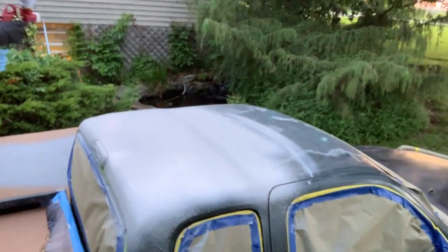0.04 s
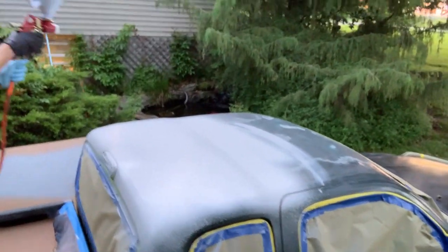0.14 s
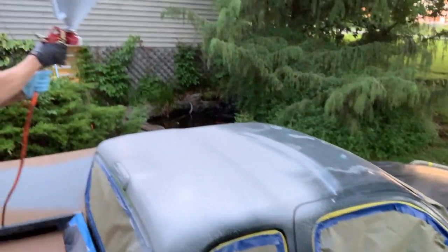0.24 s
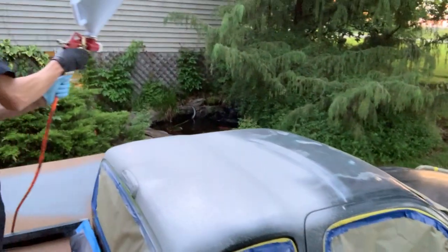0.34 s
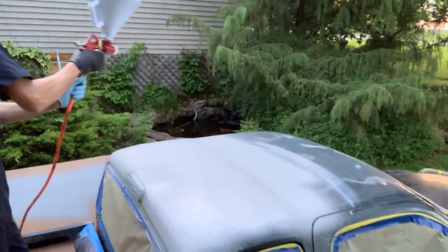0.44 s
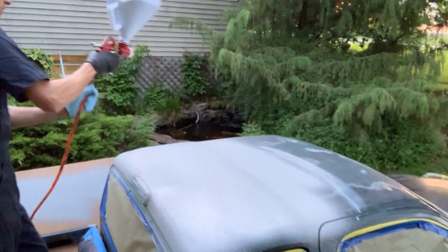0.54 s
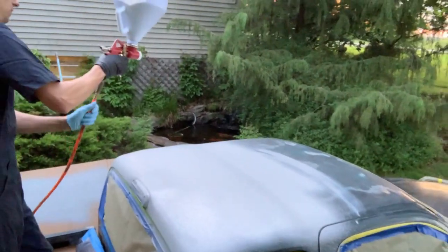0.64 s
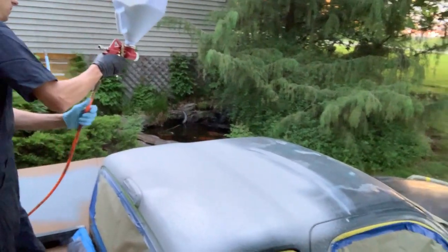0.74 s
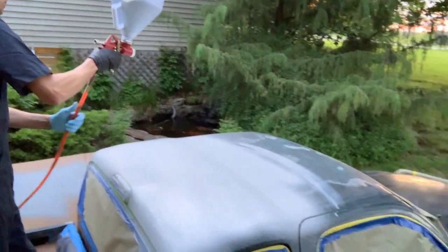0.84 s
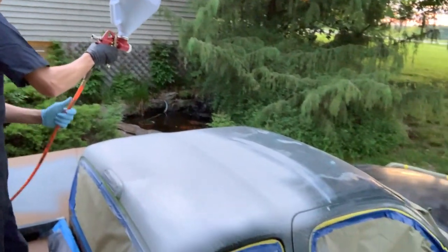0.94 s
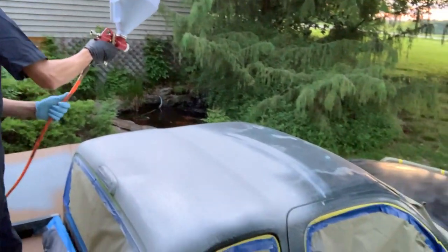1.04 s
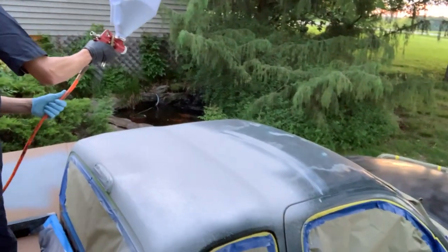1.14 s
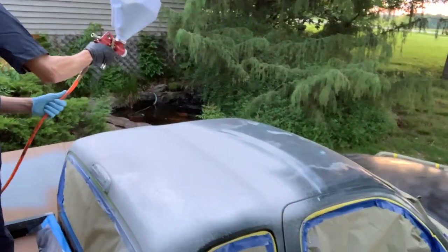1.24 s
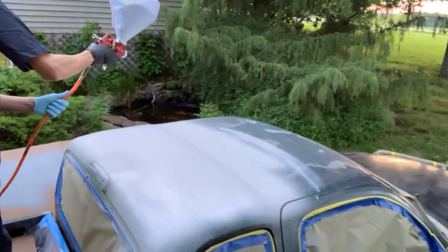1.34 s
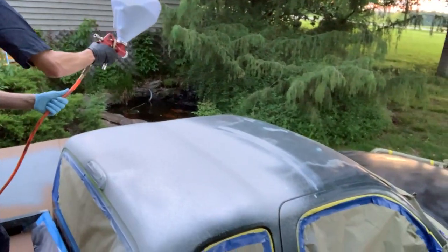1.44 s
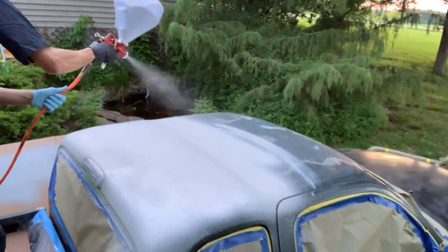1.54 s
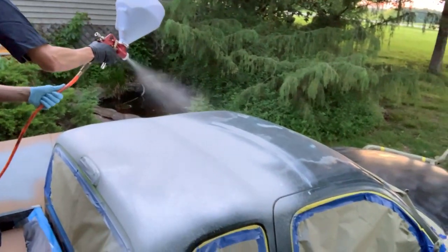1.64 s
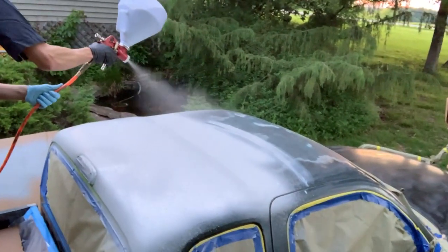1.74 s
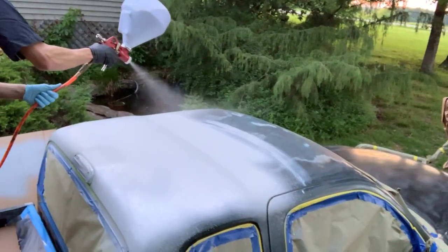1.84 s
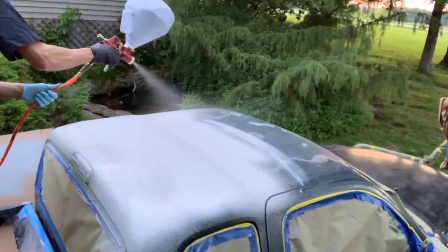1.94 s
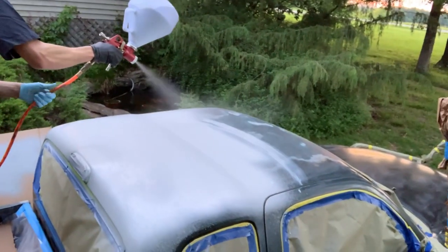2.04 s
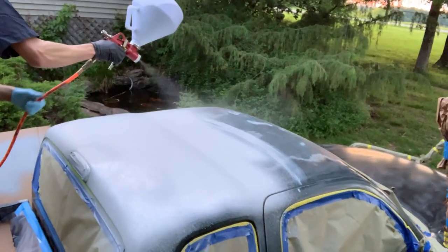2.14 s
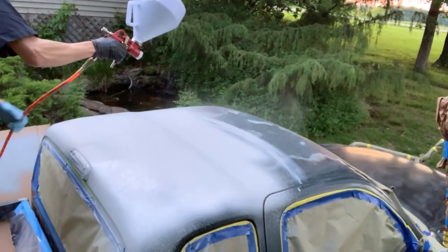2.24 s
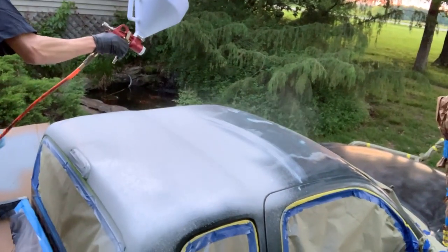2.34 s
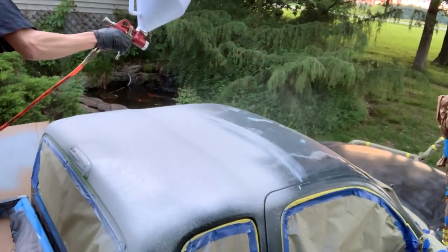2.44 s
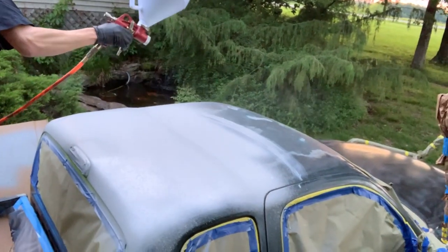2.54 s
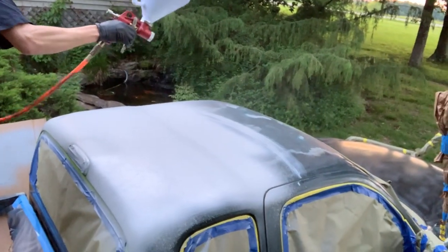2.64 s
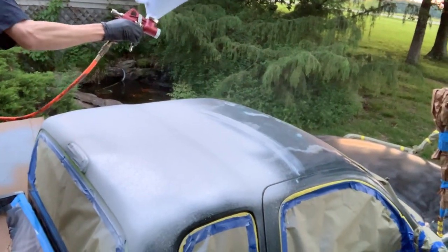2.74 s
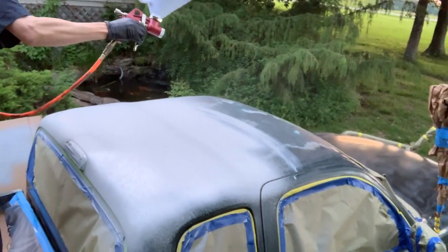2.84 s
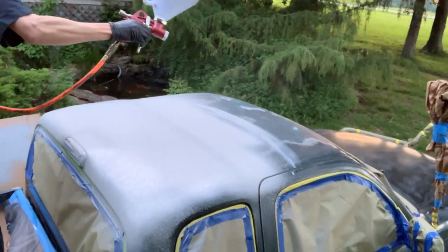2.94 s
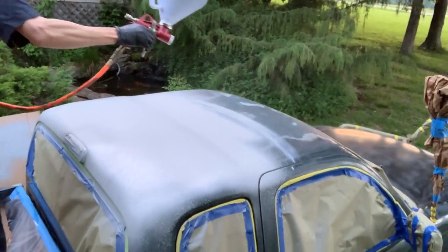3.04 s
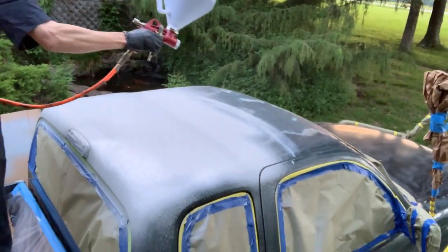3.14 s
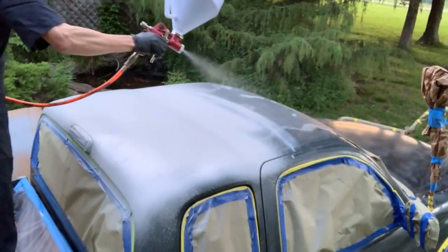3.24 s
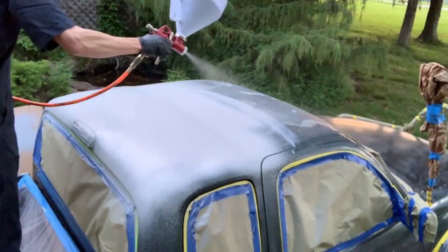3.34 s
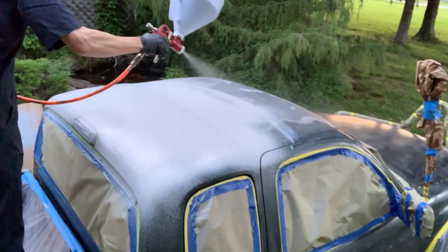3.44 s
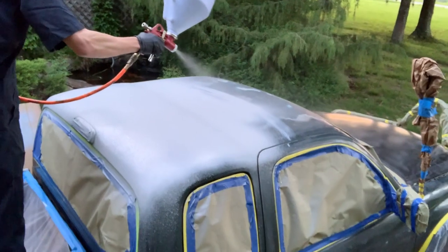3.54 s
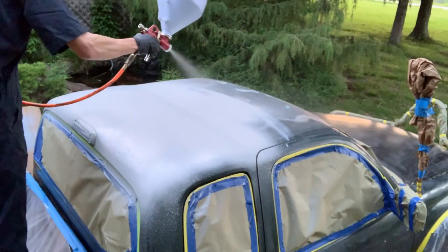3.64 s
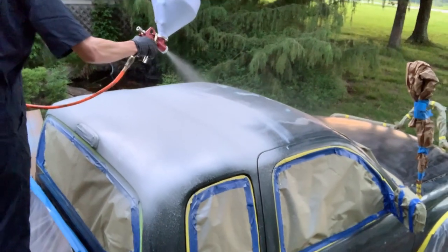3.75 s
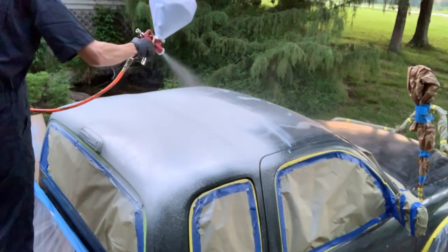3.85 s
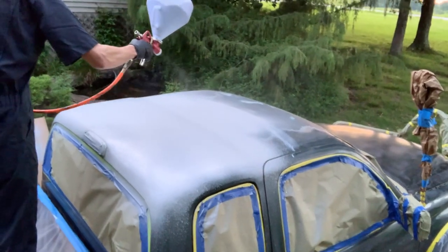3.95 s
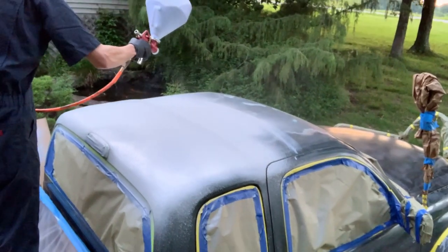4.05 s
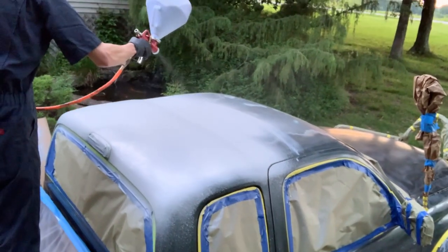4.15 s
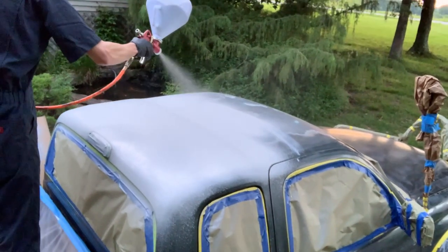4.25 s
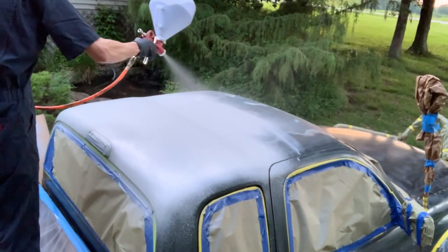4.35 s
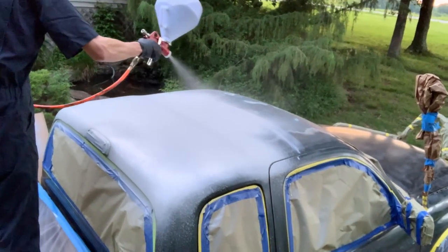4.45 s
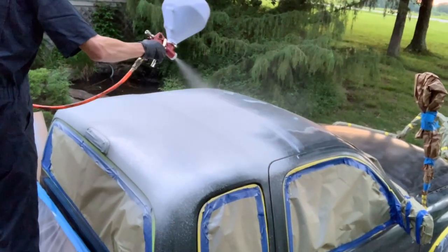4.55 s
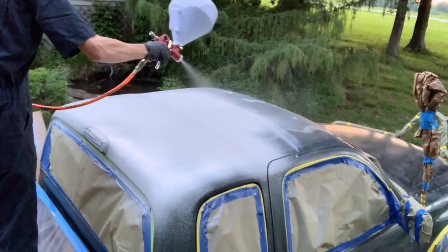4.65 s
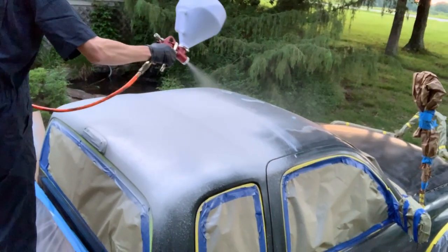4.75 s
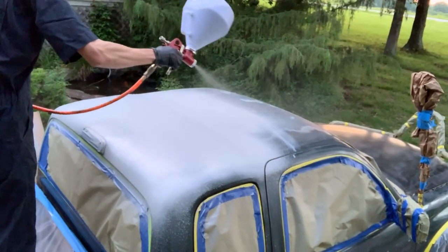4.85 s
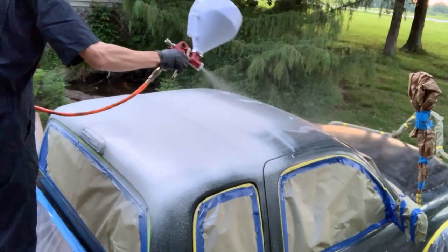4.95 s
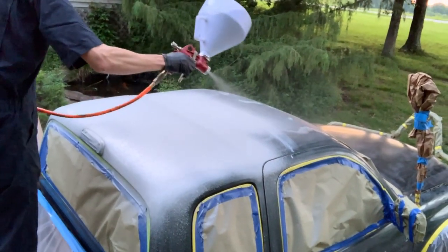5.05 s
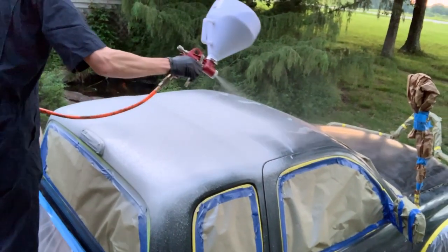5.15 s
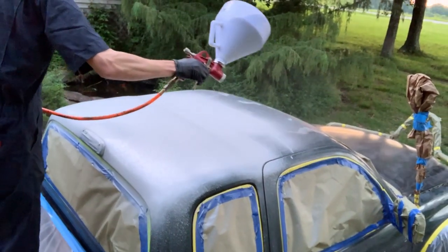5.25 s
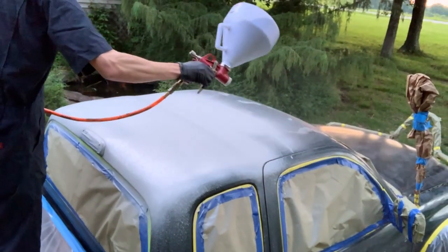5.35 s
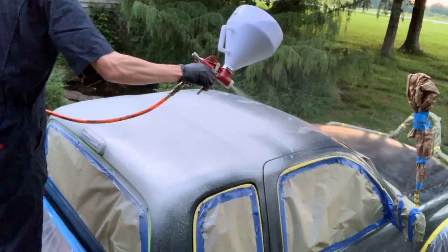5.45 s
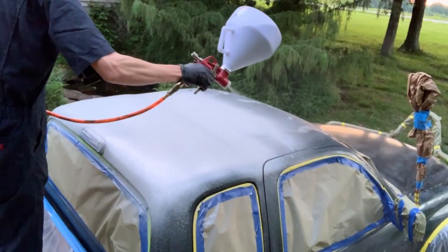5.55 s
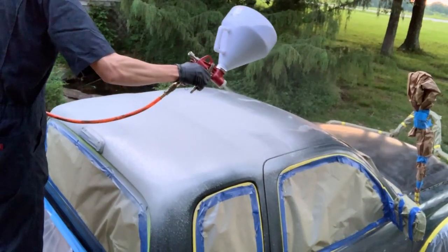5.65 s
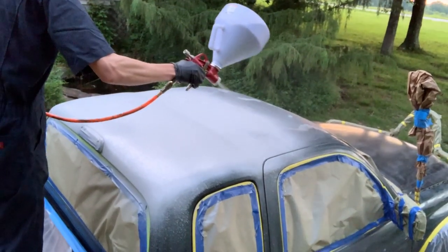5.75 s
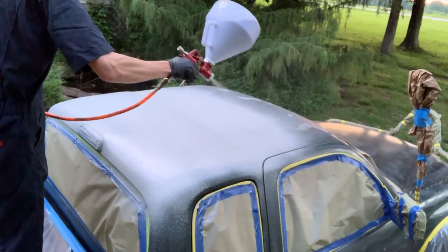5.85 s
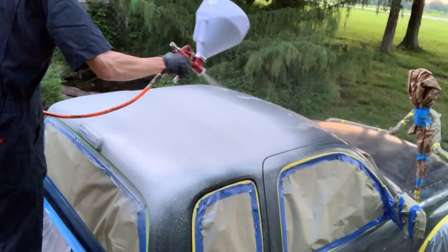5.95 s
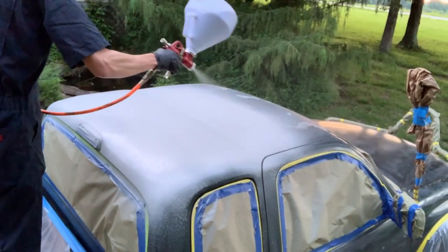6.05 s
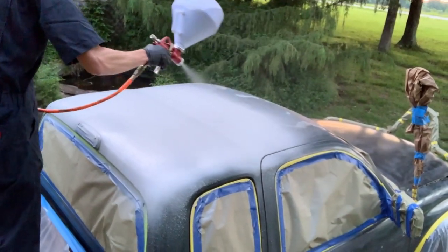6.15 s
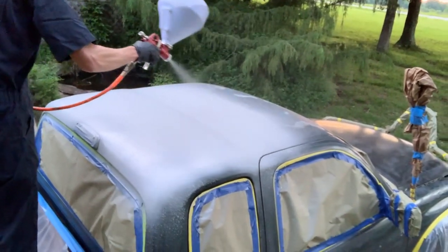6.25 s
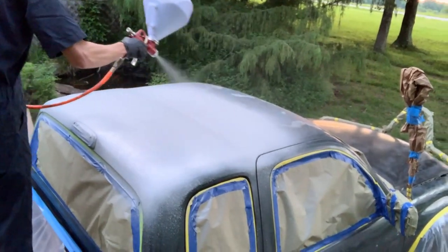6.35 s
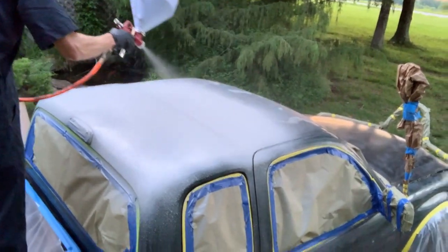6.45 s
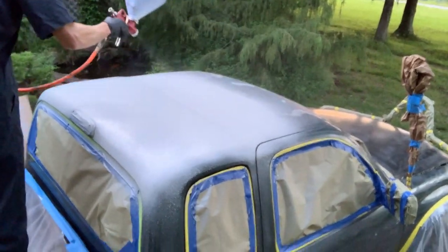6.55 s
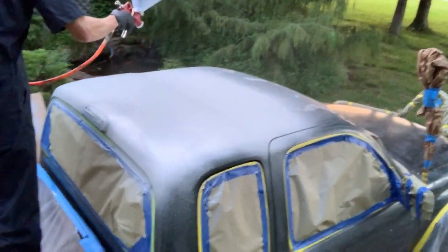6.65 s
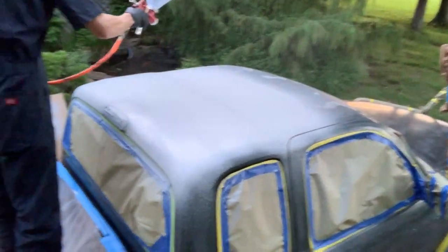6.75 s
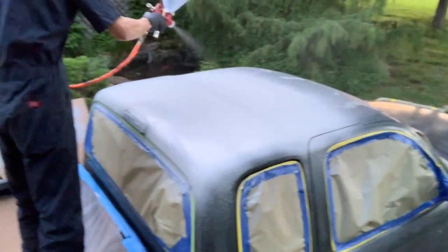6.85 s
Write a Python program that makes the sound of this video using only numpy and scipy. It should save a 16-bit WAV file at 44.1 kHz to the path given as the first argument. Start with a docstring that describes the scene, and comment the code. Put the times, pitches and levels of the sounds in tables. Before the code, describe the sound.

Outdoors, a breeze rumbles on a hand-held microphone while a paint gun gives off a constant airy hiss. After some low bumps, it sprays one short, louder burst, then three more close together, the hiss shifting with a hollow sweep as it passes over a truck cab. Light knocks fall here and there, a faint engine drones far off, and a dull thump and a gust come at the close.

```python
"""Air hisses steadily from a spray gun, over a breeze rumbling on a hand-held microphone and a few dull
thumps and knocks. A truck cab is being painted in a garden: four trigger pulls add the louder, fuller
roar of the paint fan to the turbulent air jet. The hiss interferes with its reflection from the cab's
roof, so it sweeps like a flanger as the gun moves. A distant engine hums at harmonics of its firing rate."""
import sys
import numpy as np
from scipy import signal
from scipy.fft import rfft, irfft, next_fast_len
from scipy.io import wavfile
from scipy.ndimage import uniform_filter1d, map_coordinates

SR = 44100
rng = np.random.default_rng(int(sys.argv[2]) if len(sys.argv) > 2 else 0)


def wrap_up_sound(samples):
    """Save the sound to the file named by the first command line argument, as 16-bit audio."""
    columns = np.atleast_2d(samples).T
    # keep every value between -1 and 1, then stretch to whole-number steps
    tamed = np.clip(columns, -1, 1)
    steps = np.round(tamed * 32767).astype(np.int16)
    wavfile.write(sys.argv[1], SR, steps)


N = 304290


def from_db(db):
    """Amplitude grows tenfold for every 20 dB."""
    return 10 ** (np.asarray(db) / 20)


def rms_one(x):
    """Normalisation to unit mean power."""
    return x / np.sqrt(np.mean(x ** 2) + 1e-20)


def in_time(rows):
    """Linear interpolation of (time [s], value) rows at every sample."""
    return np.interp(np.arange(N) / SR, *np.transpose(rows))


def drift(hz):
    """Low-passed noise: a random fluctuation of unit power, mostly slower than hz."""
    step, settle = 40, 2000
    r = np.exp(-2 * np.pi * step * hz / SR)
    slow = signal.lfilter([1], [1, -2 * r, r * r], rng.standard_normal(N // step + settle + 2))[settle:]
    return np.interp(np.arange(N) / step, np.arange(len(slow)), rms_one(slow))


def turbulence(colour):
    """Spectral shaping: white noise takes on the given colour, at unit power."""
    size = next_fast_len(N, real=True)
    hz, db = np.transpose(colour)
    bins = np.maximum(np.fft.rfftfreq(size, 1 / SR), 1)
    gain = from_db(np.interp(np.log(bins), np.log(hz), db))
    return rms_one(irfft(rfft(rng.standard_normal(size)) * gain, size)[:N])


def ring(force, hz, t60):
    """A damped oscillator: each impulse starts a sine that falls 60 dB in t60 seconds."""
    r, w = np.exp(-np.log(1000) / (t60 * SR)), 2 * np.pi * hz / SR
    return signal.lfilter([0, np.sin(w)], [1, -2 * r * np.cos(w), r * r], force + 1e-18)


def garden(level_db):
    """Stationary ambient noise, strongest in the bass."""
    # ambient spectrum: (frequency [Hz], relative density [dB])
    colour = [(40, 1.5), (120, 1.5), (200, -7), (450, -3), (800, -5), (1300, -6.5), (3000, -8), (8000, -41)]
    return from_db(level_db) * turbulence(colour)


def engine(firing_hz, waver, fading_db):
    """Periodic firing gives a harmonic series; each line fades independently on its way here."""
    # engine harmonics: (multiple of the firing rate, relative level [dB])
    harmonics = [(2, -54), (4, -57), (6, -66.5), (7, -60.5), (8, -59), (10, -58.5), (12, -57), (15, -52)]
    # slow change of the whole hum: (time [s], gain [dB])
    loudness = [(0, -0.5), (1.2, 0.5), (3, -1.5), (4.2, -4), (6.9, -5)]
    phase = 2 * np.pi * np.cumsum(firing_hz * (1 + waver * drift(1.95))) / SR
    hum = 0
    for k, db in harmonics:
        amplitude = from_db(db + fading_db * drift(1.5))
        hum += amplitude * np.sin(k * phase + rng.uniform(0, 2 * np.pi))
    return np.sqrt(2) * from_db(in_time(loudness)) * hum


def breeze():
    """Slow eddies press on the microphone, and their pressure fluctuations make a rumble."""
    # gusts: (time [s], level [dB])
    gusts = [(0, -23), (.4, -17), (1.7, -22), (2.0, -28), (2.6, -25.5), (4.05, -23.5), (4.45, -28.5),
             (6.3, -31), (6.5, -15.5), (6.9, -21.5)]
    # eddy spectrum: (frequency [Hz], relative density [dB])
    colour = [(2, -6), (5, 5), (11, 5.5), (17, 3.5), (22, -23), (29, -16), (37, -16.5), (46, -12),
              (65, -34), (88, -34.5), (105, -38), (300, -83)]
    return from_db(in_time(gusts)) * turbulence(colour)


def thumps(scuff_db, scuff_s, shudder_hz, shudder_db, fade_db_per_s):
    """Damped low modes ring as dull thumps on the microphone, each with a scuff."""
    # pulses that start a thump or, close behind, shape its ringing: (time [s], level [dB], duration [s])
    pulses = [(0.178, -19, .008), (0.218, -20.5, 0.0071), (.607, -6, 0.0091), (.663, -10, .01),
              (0.697, -14, 0.013), (0.839, -22.5, 0.0091), (1.629, -18, 0.02), (6.417, -10.5, .011),
              (6.463, -9.5, 0.0076), (6.49, -19, 0.0074)]
    # low modes: (frequency [Hz], gain [dB], T60 [s])
    modes = [(37.5, 7.5, 0.13), (60.6, -14, 0.093), (80, -5.5, 0.22), (139, -13.5, 0.08), (186, -17, .08)]
    # scuff of the shifting grip: (frequency [Hz], relative density [dB])
    scuff_colour = [(40, 1), (80, 1), (100, 1), (135, -3), (190, -2), (260, -15), (500, -29)]
    force = np.zeros(N)
    for s, db, length in pulses:
        pulse = np.hanning(int(length * SR))
        at = int(s * SR)
        force[at:at + len(pulse)] -= from_db(db) * pulse / pulse.sum()
    swing = sum(from_db(db) * ring(force, hz, t60) for hz, db, t60 in modes)
    slip = signal.lfilter([1], [1, -np.exp(-1 / (scuff_s * SR))], force + 1e-18)
    scuff = from_db(scuff_db) * slip * turbulence(scuff_colour)
    # the last thump leaves a dying shudder, unsteady in pitch and level
    age = np.maximum(np.arange(N) / SR - pulses[-1][0], 0)
    phase = 2 * np.pi * np.cumsum((age > 0) * shudder_hz * (1 + 0.13 * drift(15))) / SR
    shudder = from_db(shudder_db - fade_db_per_s * age + 4 * drift(12)) * np.sin(phase)
    return swing + scuff + shudder


def knocks(rattle, rattle_s, spread_db):
    """Modal superposition: an impulse and a brief rattle excite each mode with a strength of its own."""
    # impacts: (time [s], body level [dB], clack level [dB], tick level [dB])
    impacts = [(.186, -35, -32.5, -55), (.711, -14, -21, -38), (.757, -25, -35, -55),
               (.786, -26, -25.5, -33), (.83, -42, -35, -43), (1.714, -27.5, -45, -55),
               (2.441, -15.5, -34.5, -18.5), (2.461, -19.5, -31, -37), (3.105, -38, -32.5, -40),
               (3.835, -29, -32, -45)]
    # modes of the hollow body, hard clack and bright tick: (frequency [Hz], gain [dB], T60 [s])
    body = [(169, -7, 0.074), (260, 0, 0.028), (324, -2, 0.026), (436, -12, 0.038)]
    clack = [(518, 1, 0.028), (840, -0.5, 0.042), (1092, -6.5, 0.055), (1280, -8, 0.033)]
    tick = [(1405, 7.5, 0.015), (1800, -4, .02)]
    times, body_db, clack_db, tick_db = np.transpose(impacts)
    age = np.arange(SR // 20) / SR
    out = np.zeros(N)
    for modes, levels in (body, body_db), (clack, clack_db), (tick, tick_db):
        for k, (hz, mode_db, t60) in enumerate(modes):
            force = np.zeros(N)
            for s, db in zip(times, levels):
                contact = (age == 0) + rattle * rng.standard_normal(len(age)) * np.exp(-age / rattle_s)
                at = int(s * SR)
                force[at:at + len(age)] += from_db(db + spread_db * rng.standard_normal()) * contact
            out += (-1) ** k * from_db(mode_db) * ring(force, hz, t60)
    return out


def roof(jet, flow, ease_s, low_cut_hz):
    """Comb filtering: jet and echo interfere; the notches spread and deepen as the gun nears the roof."""
    # extra travel time of the echo as the arm sweeps: (time [s], delay [ms])
    sweep = [(0.0, 1.393), (0.62, 1.426), (1.05, 1.192), (1.2, 1.019), (1.54, 0.84), (1.88, 0.742),
             (2.22, 0.828), (2.66, 1.166), (2.97, 1.277), (3.45, 0.759), (3.71, 0.68), (4.61, 0.671),
             (4.89, 0.755), (5.47, 1.071), (5.83, 0.818), (6.34, 0.669), (6.9, 0.604)]
    # a shorter path gives a stronger echo: (delay [ms], relative level [dB])
    echo_levels = [(.68, -6.2), (.8, -7.4), (1.0, -12.3), (1.4, -17)]
    delay_ms = uniform_filter1d(in_time(sweep), int(ease_s * SR), mode="nearest")
    # a small curved panel reflects little of the long waves
    reflected = signal.sosfilt(signal.butter(1, low_cut_hz, "high", fs=SR, output="sos"), jet)
    read_at = np.arange(N) - delay_ms * SR / 1000
    echo = map_coordinates(reflected, [read_at], order=5, mode="nearest")
    loss_db = 2 - flow  # air alone is reflected less than the paint fan
    strength = from_db(np.interp(delay_ms, *np.transpose(echo_levels)) - loss_db)
    return (jet + strength * echo) / np.sqrt(1 + strength ** 2)


def spits(per_s, spread_db):
    """A Poisson process: larger drops burst at the nozzle at random, each with a tiny tick."""
    bursts = rng.random(N) < per_s / SR
    sizes = from_db(spread_db * np.clip(rng.standard_normal(N), -2, 1)) * rng.choice([-1, 1], N)
    band = signal.butter(1, [2500, 11000], "band", fs=SR, output="sos")
    return signal.sosfilt(band, bursts * sizes + 1e-18)


def trigger(attack_s, dwindle_power):
    """A needle valve meters the paint: the flow opens quickly, holds, then decays by a power law."""
    # trigger pulls, each with one swell of the fan's rush: (start [s], let go [s], level [dB],
    # sag [dB/s], treble gain [dB], release [s], swell time [s], swell half-width [s], swell size [0-1])
    pulls = [(1.509, 2.143, -20, -.3, -.3, 0.16, 2.16, .3, 0.4),
             (3.201, 3.907, -18.5, 2.5, 0.5, 0.065, 3.63, .35, .85),
             (4.217, 5.25, -20.0, -0.5, 0.05, 0.056, 4.7, 0.39, .9),
             (5.452, 6.533, -18.5, .5, -0.5, 0.053, 5.88, .55, 1.0)]
    t = np.arange(N) / SR
    flow = fan_gain = swell = treble_db = 0
    for start, let_go, db, sag, bright_db, release, swell_at, swell_s, swell_size in pulls:
        rise = np.clip((t - start) / attack_s, 0, 1)
        opening = rise / (1 + np.maximum(t - let_go, 0) / release) ** dwindle_power
        held_s = np.clip(t, start, let_go) - start
        flow = np.maximum(flow, opening)
        fan_gain = np.maximum(fan_gain, from_db(db - sag * held_s) * opening)
        swell += swell_size * np.exp(-((t - swell_at) / swell_s) ** 2)
        treble_db += bright_db * opening
    return flow, fan_gain, swell, treble_db - 0.5 * swell  # a swell slightly dulls the treble


def air_jet():
    """Jet noise: turbulent air hisses from the cap all the time."""
    # slow change as the gun is carried about: (time [s], level [dB])
    loudness = [(0, -29.5), (1.05, -29), (1.35, -27.5), (3.15, -27), (4.15, -28.5), (5.4, -26.5),
                (6.9, -28.5)]
    # the hiss as heard, with microphone peaks near 7.3 and 8.9 kHz: (frequency [Hz], relative density [dB])
    colour = [(100, -19), (500, -17.5), (1100, -6.5), (2200, -2.5), (3400, 1), (4300, 2.5), (5600, -6),
              (6400, -3.5), (7300, -0.1), (8900, 2.5), (11200, -4.5), (13500, -7), (15800, -8)]
    return from_db(in_time(loudness)) * turbulence(colour)


def paint_fan(swell, rush_hz, rush_width_hz, flutter_db, sputter_db):
    """Atomisation: the fan's roar flutters as the liquid tears into droplets."""
    # the roar as heard, with the same two microphone peaks: (frequency [Hz], relative density [dB])
    colour = [(150, -27), (330, -14), (950, -8.5), (1600, -5.5), (2100, -5.5), (2750, -3), (4100, 1.5),
              (5500, -7.5), (6300, -7), (7300, -2), (8000, -4.5), (8950, -2.5), (11300, -10.5),
              (15800, -15)]
    roar = turbulence(colour)
    rush = signal.lfilter(*signal.iirpeak(rush_hz, rush_hz / rush_width_hz, fs=SR), roar)
    rush_db = -2.5 + 5 * swell  # a swell lifts the loudest band
    drops = from_db(15) * spits(per_s=12, spread_db=3)
    tearing_db = flutter_db * drift(18) + sputter_db * drift(250)
    return from_db(tearing_db) * (roar + (from_db(rush_db) - 1) * rush + drops)


def spray_gun(air, paint, treble_db, surge_db, beam_hz):
    """Directivity: short waves are beamed, so only the jet's treble changes as the nozzle turns."""
    jet = (air + paint) * from_db(surge_db * drift(22))
    treble = signal.sosfilt(signal.butter(1, beam_hz, "high", fs=SR, output="sos"), jet)
    return jet + (from_db(treble_db) - 1) * treble


def scene():
    """Superposition: all sources add at one microphone, so both channels are alike."""
    flow, fan_gain, swell, treble_db = trigger(attack_s=0.041, dwindle_power=1.15)
    air = air_jet()
    paint = fan_gain * paint_fan(swell, rush_hz=4100, rush_width_hz=1900, flutter_db=0.3, sputter_db=0.7)
    jet = spray_gun(air, paint, treble_db, surge_db=0.27, beam_hz=6100)
    gun = roof(jet, flow, ease_s=0.25, low_cut_hz=1500)
    background = engine(firing_hz=45.34, waver=0.0014, fading_db=1.5) + garden(level_db=-42.5)
    handling = thumps(scuff_db=-16.5, scuff_s=0.021, shudder_hz=63.6, shudder_db=-24, fade_db_per_s=27)
    bumps = knocks(rattle=0.025, rattle_s=0.01, spread_db=1.0)
    mono = background + breeze() + handling + bumps + gun
    return np.stack([mono, mono])


def record(dry):
    """The microphone port cuts a narrow notch, saturation rounds the peaks, a low-pass cuts the top."""
    notch_hz, notch_width_hz, notch_depth = 4710, 294, 0.94
    ceiling, cutoff_hz = 0.95, 15700
    port = signal.iirpeak(notch_hz, notch_hz / notch_width_hz, fs=SR)
    notched = dry - notch_depth * signal.lfilter(*port, dry)
    rounded = notched / (1 + (notched / ceiling) ** 8) ** (1 / 8)
    return signal.sosfilt(signal.ellip(12, 0.1, 90, cutoff_hz, fs=SR, output="sos"), rounded)


dry = scene()
out = record(dry)
wrap_up_sound(out)
```